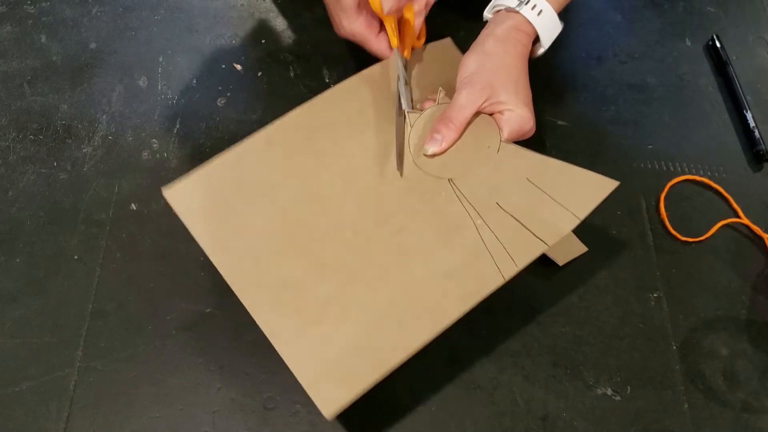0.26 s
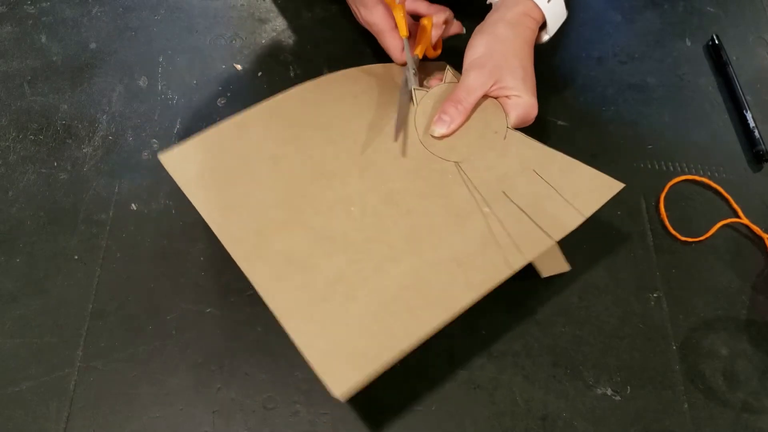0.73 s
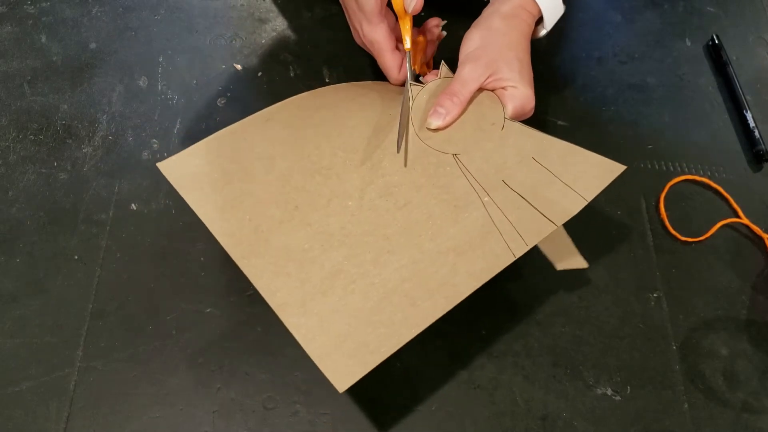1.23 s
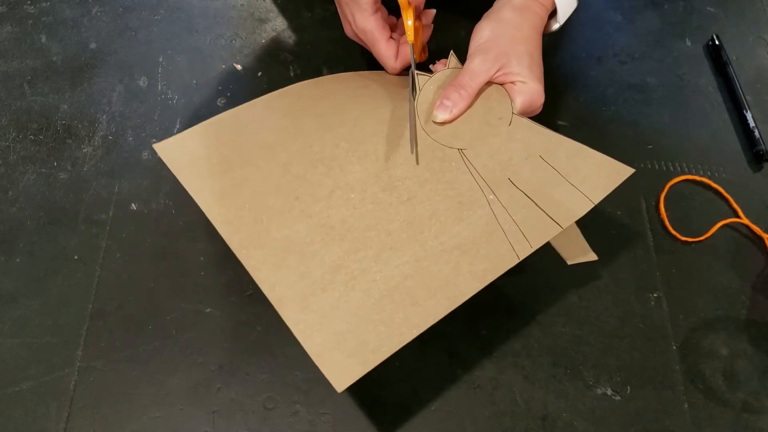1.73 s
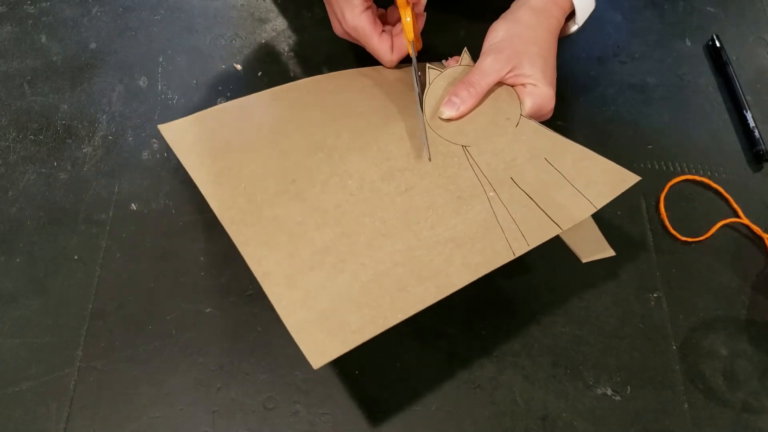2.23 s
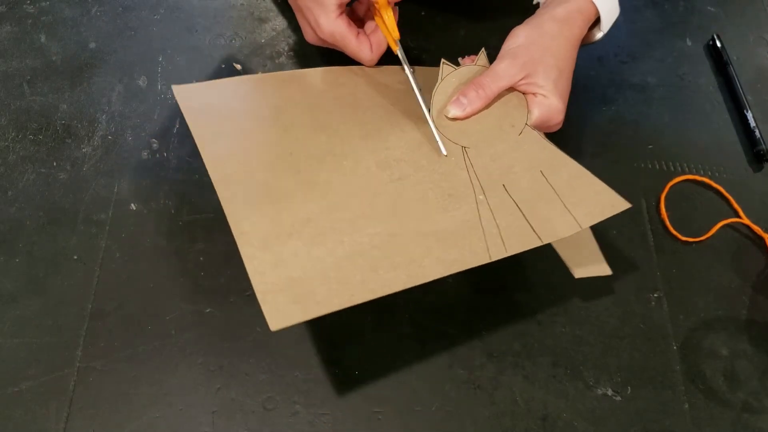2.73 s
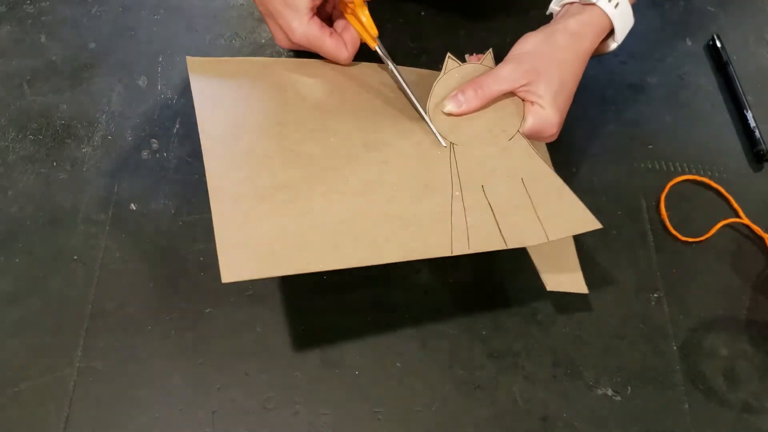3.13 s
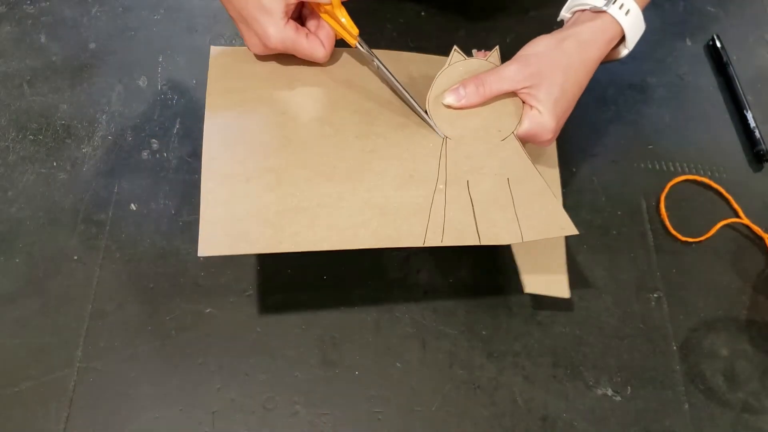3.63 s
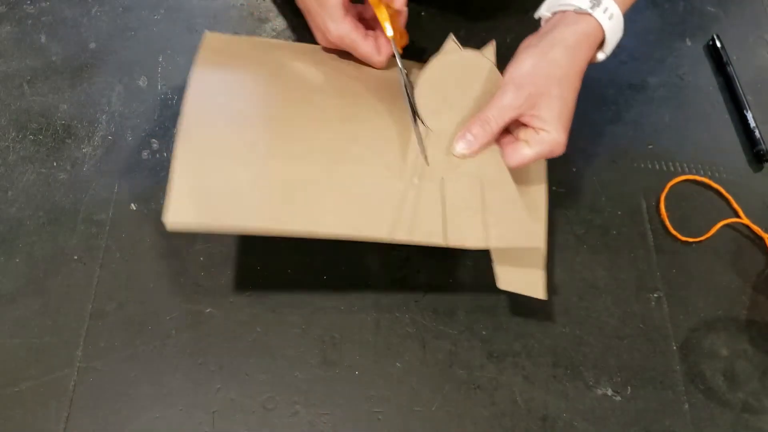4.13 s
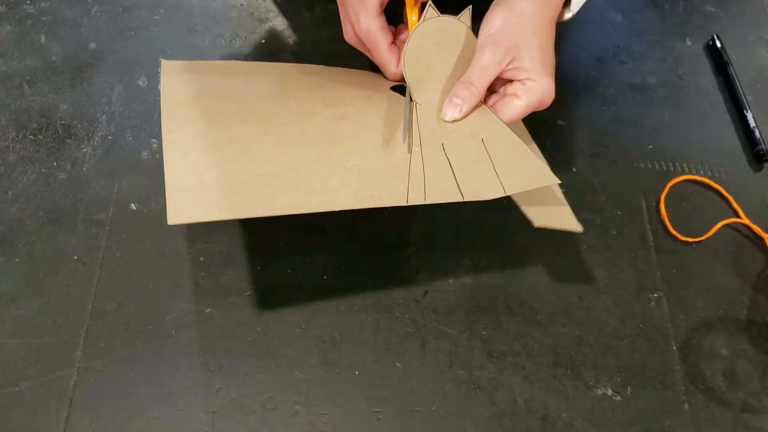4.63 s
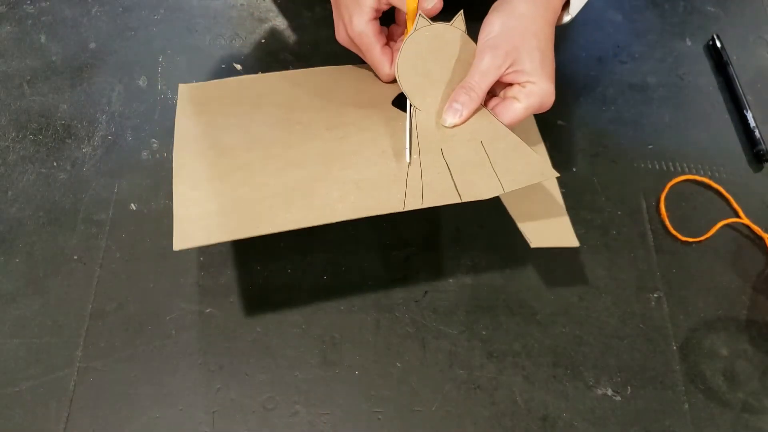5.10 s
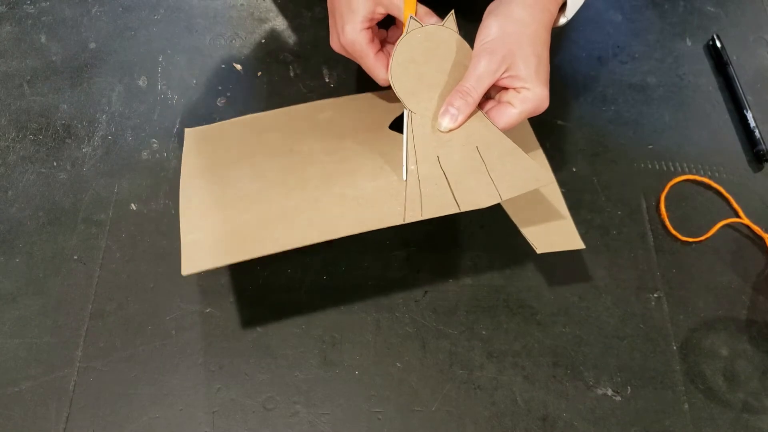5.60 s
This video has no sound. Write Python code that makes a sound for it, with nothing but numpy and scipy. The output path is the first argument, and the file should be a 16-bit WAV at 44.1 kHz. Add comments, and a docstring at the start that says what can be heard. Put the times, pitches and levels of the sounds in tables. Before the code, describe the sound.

Close stereo sound of scissors cutting thin cardboard, in about six seconds. From 0 to 0.9 s the card is handled: a dull bump near the start, short dry rasps around 0.3 to 0.7 with small creaks, and hollow, drumhead-like knocks at about 0.8. After a short pause, a slow cut from 1.25 crackles very faintly with tiny fibre snaps and slight blade grind. From 2.1 the snips grow stronger, becoming loud, crisp, irregular crunches with boxy thumps between 2.7 and 3.8, densest near 3.3 and 3.65. From 3.85 to 4.4 the sheet is turned with soft slides, light knocks and a small click. Near-quiet follows until 4.85, when another crackling stroke builds, with bright steel clacks at 5.23 to 5.4. Brief scrapes and a knock come at 5.65 to 5.8. A small hard room adds a short lively tail over faint steady air.

```python
"""First thin cardboard, bumped in the hand, knocks like a drumhead, then scissors work through it in uneven strokes.
Bursts of tiny snaps drive the modes of sheet and blades, and single fibres crackle in between. Streams of tiny
slips make the card's slide and the blades' grind, wavering resonances the creaks and strong single sheet modes,
and steel kicks the clacks, loudest near the end. A small, hard-walled room adds its tail, standing waves and
faint rush of air; a phone with two microphone ports hangs above the work."""
import sys
import numpy as np
from scipy import signal
from scipy.fft import rfft, irfft
from scipy.io import wavfile
from scipy.ndimage import uniform_filter1d

SR = 44100
rng = np.random.default_rng(int(sys.argv[2]) if len(sys.argv) > 2 else 0)


def generate_wav(sig):
    """Save sig (samples, or channels by samples) to the path in sys.argv[1] as 16-bit PCM at SR."""
    pcm = np.round(np.clip(np.atleast_2d(sig).T, -1, 1) * 32767).astype(np.int16)
    wavfile.write(sys.argv[1], SR, pcm)


N = 258426  # length of the scene in samples
TIME = np.arange(N) / SR
BURST_SIZE = 4096  # samples

# Levels in the tables are the balance within each layer; scene() trims whole layers.
# fibres giving way, and knocks of the card as it is handled and flexes:
# [t/s, time to peak/ms, sheet knock level/dB, crisp treble level/dB]
TEARS_AND_KNOCKS = [(0.079, 2.53, -43.5, -58), (0.3211, 0.96, -57.5, -62), (0.7975, 3.7, -42.5, -51),
                    (0.8622, 1.97, -43, -66), (1.3485, 1.8, -79, -69), (1.381, 5.5, -57.5, -61.5),
                    (1.4584, 1.08, -62, -63), (1.5225, 5.8, -55.5, -59.5), (1.5661, 4.8, -57.5, -63),
                    (1.596, 2.54, -65, -63.5), (1.704, 0.62, -87, -73), (1.759, 4.2, -60, -57),
                    (1.7697, 1.85, -64.5, -62.5), (1.8351, 0.85, -67, -60), (1.868, 0.77, -57, -57.5),
                    (1.8842, 0.81, -64, -59.5), (1.9214, 0.83, -59, -65.5), (1.977, 5.1, -54, -58),
                    (1.9869, 1.45, -52.5, -54), (2.0026, 4.6, -64, -60), (2.039, 7.9, -60.5, -58.5),
                    (2.1273, 2.3, -46, -45), (2.1575, 2.8, -49.5, -52), (2.1915, 2.5, -54.5, -62.5),
                    (2.229, 1.65, -55, -83), (2.2675, 3.15, -41, -51), (2.2921, 2.15, -45.5, -59),
                    (2.419, 2.52, -35.5, -50), (2.458, 2.7, -47, -53.5), (2.4908, 1.1, -41.5, -60.5),
                    (2.5675, 3.4, -44, -56), (2.621, 6.9, -42, -53.5), (2.6387, 1.52, -46, -63),
                    (2.7193, 2.27, -31, -41.5), (2.771, 2, -37, -46), (2.9382, 2.12, -29, -47),
                    (2.9906, 1.55, -30, -44.5), (3.0587, 0.4, -37, -50.5), (3.1436, 3.2, -30.5, -43),
                    (3.2992, 0.37, -46, -54.5), (3.309, 3.08, -28, -41), (3.3349, 0.74, -45, -52),
                    (3.3425, 1.34, -32, -44.5), (3.3708, 3.8, -37, -44), (3.4357, 1.9, -43.5, -51.5),
                    (3.634, 4.13, -30, -37), (3.6944, 0.53, -35, -42.5), (3.712, 4.9, -31.5, -37),
                    (3.8068, 2.15, -39.5, -43), (4.0027, .85, -57, -65), (4.058, 2.1, -48.5, -60.5),
                    (4.2394, 0.87, -38, -56.5), (4.2691, 2.3, -53, -71), (4.3812, 2, -50, -71),
                    (4.857, 6.5, -48, -58), (4.873, 2.9, -54, -51.5), (4.8921, 1.4, -53, -59),
                    (4.9556, 5.6, -63, -50), (4.9964, 2.1, -44.5, -46.5), (5.025, 1.6, -42, -52),
                    (5.1039, 3.2, -43, -48), (5.147, 2.73, -45, -51.5), (5.2335, 2.4, -42, -39),
                    (5.2513, 6, -37.5, -48), (5.3211, 1.36, -39, -50), (5.3535, 1.9, -39, -48),
                    (5.3935, 3.2, -36.5, -41), (5.4277, 3.23, -34, -39), (5.7352, 2.93, -41.5, -58),
                    (5.811, 0.59, -33, -55)]
# where the knock centres as the sheet is turned and gripped anew: [t/s, f/Hz]
SHEET_PITCH = [(0.1, 774), (1.87, 850), (1.98, 544), (2.45, 590), (3.65, 531), (3.82, 820), (4.1, 810),
               (4.24, 559), (5.2, 555), (5.8, 690)]
# bending modes of the held sheet: [f/Hz, width/Hz, level/dB]
SHEET_MODES = [(114, 110, -27.5), (314.6, 51, -5.5), (425.4, 39, 2), (507.7, 30, -1.5), (657.4, 11, 0.5),
               (776, 130, -8.5), (892.5, 97, -3), (1073, 98, -6)]
# mid-range spectrum of the snaps: [f/Hz, level/dB]
CRACK_SPECTRUM = [(700, -18.5), (1200, -11.5), (1450, -0.5), (1850, 0.5), (2400, -1.5), (3200, -1.5),
                  (4500, -3.5), (5500, -20.5), (8000, -41.5)]
# treble spectrum of the snaps: [f/Hz, level/dB]
CRISP_SPECTRUM = [(3000, -18), (5000, -5), (6300, -1), (7250, 3), (8100, -6.5), (9800, -3.5), (11000, -6.5),
                  (13000, -3), (15400, -7), (17000, -2)]
# the crack's level lies between treble and knock: share of the knock, and the crack's centre in Hz
CRACK_KNOCK_SHARE, CRACK_HZ = 0.19, 2040

# the hand squeezing the blades through the card: [start t/s, length/s, crackle level at the start/dB]
STROKES = [(1.252, 1, -72.5), (2.131, .56, -71.5), (3.291, 0.068, -64), (3.668, 0.2, -63),
           (4.852, 0.62, -57)]
SQUEEZE_DB_PER_S, STROKE_ATTACK_S, STROKE_RELEASE_S = 1.5, 0.047, 0.039

# card sliding on steel: [start t/s, length/s, level/dB, rumble relative level/dB, hiss relative level/dB]
SLIDES = [(0.0, 0.013, -67.5, 6, 5.5), (0.185, .08, -75, 6, 2.5), (0.276, .12, -57, -2.5, -2.5),
          (0.413, 0.08, -45, -8.5, -3.5), (0.556, 0.056, -47, -14, -8), (0.617, 0.092, -46, -1, -7),
          (0.748, 0.053, -43.5, -4, -15), (0.832, 0.02, -48.5, -1, 6), (3.848, 0.13, -66, -13, 5.5),
          (4.007, 0.1, -58, 4.5, -4), (4.104, 0.081, -55, 6, -6.5), (4.23, 0.055, -55.5, 8, 2.5),
          (4.327, 0.19, -70, -1.5, 1.5), (5.656, 0.063, -54.5, -2.5, -0.5), (5.745, 0.021, -41, -6, -2.5),
          (5.806, 0.067, -44.5, -3, -4.5)]
SLIDE_ATTACK_S, SLIDE_RELEASE_S = 0.033, 0.011
# low spectrum of the sheet: [f/Hz, level/dB]
RUMBLE_SPECTRUM = [(30, -64), (120, -25), (220, -17), (330, -14.5), (420, 0), (540, -2), (590, -2),
                   (645, 10.5), (710, -3.5), (830, 4.5), (1120, 1.5), (1400, -18.5), (2200, -24)]
# mid-range spectrum of the sliding card: [f/Hz, level/dB]
RASP_SPECTRUM = [(100, -50), (800, -2.5), (1300, -1), (1600, -4.5), (2200, -3), (3000, -5), (3700, -9.5),
                 (4400, -11.5), (7000, -19)]
# treble spectrum of the sliding card: [f/Hz, level/dB]
HISS_SPECTRUM = [(3000, -22.5), (5000, -6), (6200, -4), (7200, -2), (8300, -10.5), (11000, -6),
                 (13500, -4.5), (15500, -13), (17000, 0)]

# resonances of the grinding blades, before grinding() sharpens them: [f/Hz, width/Hz, level/dB]
GRIND_MODES = [(885, 130, 3.5), (1970, 120, -0.5), (2296, 260, -2), (7000, 220, 0), (7490, 630, -4)]
# in the first slow stroke the blades stand open and ring freely; otherwise the wedged card quiets the jolts
FREE_START_S, FREE_LENGTH_S, WEDGED_DB = 1.237, 0.742, -15.5
# the jolt of a light burst, its growth in dB per dB of crisp treble, and its time to peak
LIGHT_BURST_DB, JOLT_DB, JOLT_GROWTH, JOLT_MS = -60, -57, 1, 2.7

# blades knocking together: [t/s, level/dB, ring centre f/Hz, ring spread/octaves, contact time/ms]
CLACKS = [(0.862, -56, 2180, 0.75, 1.2), (3.2991, -42, 1810, 0.22, 0.76), (3.3425, -45.5, 2400, 0.38, 0.8),
          (4.2299, -47.5, 2200, 0.41, 0.62), (5.234, -28.5, 3440, 0.39, 0.47),
          (5.3194, -35.5, 2180, 0.23, 1.5), (5.3532, -43, 2060, 0.22, 2.97),
          (5.3934, -35.5, 1920, 0.36, 2.05)]
# ring of the blades: [f/Hz, width/Hz, level/dB]
BLADE_MODES = [(1966, 53, 0.5), (2080, 79, 7.5), (2610, 410, 5), (3140, 86, -5), (3510, 85, -2),
               (3840, 260, 2), (4300, 670, -5), (4700, 1400, -4.5), (7000, 400, -10.5)]

# creaks of card on steel, and single modes of the sheet ringing out strongly:
# [peak t/s, half length/s, f/Hz, level/dB]
CREAKS_AND_RINGS = [(0.432, 0.0037, 825, -41.5), (0.447, 0.013, 3720, -48), (0.454, 0.023, 1334, -48),
                    (0.679, 0.046, 2230, -51), (0.799, 0.006, 318, -56.5), (0.865, 0.0031, 275, -54),
                    (3.315, 0.0087, 872, -35.5), (3.356, 0.01, 289, -46.5), (4.865, 0.013, 792, -46.5),
                    (5.001, 0.007, 6030, -47.5), (5.165, 0.018, 284.6, -53.5), (5.346, 0.026, 378.5, -47.5)]
CREAK_Q = 12

# reverberation: [f/Hz, level against the direct sound/dB, t60/s]
ROOM_TAIL = [(150, 9.5, 0.3), (515, -6.5, 0.37), (1170, -4, 0.35), (3140, 0.5, 0.32), (7240, -6, 0.38),
             (15000, 0, 0.25)]
# standing waves of the room: [f/Hz, width/Hz, level/dB]
ROOM_MODES = [(301, 9.8, 3), (333, 7.3, -6.5), (407.6, 10.9, 1), (432, 6.3, -6), (504.3, 42, -1.5),
              (547, 5.2, 2.5), (647.2, 10, 3), (815, 7, -11), (805, 12, -15.5), (877, 6.3, -9),
              (1010, 2.3, -18.5), (1132, 6.2, 0.5), (1892, 9.1, 4.5), (1917, 24, -14)]
# spectrum of the empty room: [f/Hz, level/dB]
AIR_SPECTRUM = [(20, -20), (35, -5), (50, 3), (80, -2.5), (150, -10.5), (205, -2), (250, -17), (400, -13),
                (600, -19), (2400, -20.5), (8000, -30.5), (13000, -22.5), (16000, -24.5)]
AIR_DB = -76
# colour of the two ports: [f/Hz, left minus right level/dB]
PORT_BALANCE = [(100, 3.5), (250, 1), (500, 3), (1200, 3), (2200, 3), (4200, 3), (6000, 3), (7500, 10),
                (10000, -3.5), (15000, 3.5)]
TOP_HZ = 16100  # upper edge of the phone's range


def tears_and_knocks(knock_db, crack_db, crisp_db):
    """Each tear or bump of the card cracks, sprays treble and lets the bent sheet spring back."""
    out, f = np.zeros((2, N)), bins(BURST_SIZE)
    # the sheet radiates its middle range best
    radiation = 1 / np.sqrt((1 + (200 / f) ** 2) * (1 + (f / 1500) ** 4))
    crack = causal(colour(CRACK_SPECTRUM, BURST_SIZE) * bump(CRACK_HZ, octaves=0.48))
    crisp = colour(CRISP_SPECTRUM, BURST_SIZE)
    for s, ms, knock, treble in TEARS_AND_KNOCKS:
        crack_a, crack_b, crisp_a, crisp_b = (burst(ms, rate=9000, scatter_db=3.0) for _ in range(4))

        # the sheet is bent a little differently every time, which moves its modes
        bend = 1 + 0.039 * rng.standard_normal(len(SHEET_MODES))
        bent_modes = [(hz * k, width, db) for (hz, width, db), k in zip(SHEET_MODES, bend)]
        sheet = resonances(bent_modes, BURST_SIZE)
        knock_hz = np.interp(s, *np.transpose(SHEET_PITCH))
        # the sheet gets one clean kick besides the snaps; in a tear, the blade's load suddenly lets go
        kick = 1.2 * crack_a / np.sqrt(np.sum(crack_a ** 2) + 1e-18)
        kick[int(ms * .7 * SR / 1e3)] += 1
        drumhead = causal(sheet * radiation * bump(knock_hz, octaves=0.44))
        add(out, s, ring(kick, drumhead, knock + knock_db))

        sharp = treble + CRACK_KNOCK_SHARE * (knock - treble)
        add(out, s, ring(ports(crack_a, crack_b, likeness=0.42), crack, sharp + crack_db))

        # harder knocks reach higher: dB an octave above 7 kHz
        slope_db = 0.16 * (knock + 43)
        brightness = undb(slope_db * np.log2(np.maximum(f / 7000, 1)))
        spray = ports(crisp_a, crisp_b, likeness=0.057)
        add(out, s, ring(spray, causal(crisp * brightness), treble + crisp_db))
    return out


def creep(knock_db, crack_db, crisp_db):
    """Single fibres keep crackling between the larger tears, the louder the harder the squeeze."""
    sound = undb(knock_db) * rub(RUMBLE_SPECTRUM, rate=600, scatter_db=2, likeness=.9)
    sound += undb(crack_db) * rub(CRACK_SPECTRUM, rate=700, scatter_db=3.5, likeness=.55)
    sound += undb(crisp_db) * rub(CRISP_SPECTRUM, rate=1600, scatter_db=3.5, likeness=.15)
    return sound * squeeze() * undb(4.5 * walk(rate=90))


def sliding(rumble_db, rasp_db, hiss_db, catch_db):
    """The cut edge drags along the blade, catching unevenly, and the sheet radiates it."""
    rasp, rumble, hiss = np.zeros((3, N))
    for s, length, db, low_db, high_db in SLIDES:
        drag = gesture(s, length, SLIDE_ATTACK_S, SLIDE_RELEASE_S) * undb(db)
        rasp += drag
        rumble += drag * undb(low_db)
        hiss += drag * undb(high_db)
    sound = rumble * undb(rumble_db) * rub(RUMBLE_SPECTRUM, rate=2500, scatter_db=2.0, likeness=0.89)
    sound += rasp * undb(rasp_db) * rub(RASP_SPECTRUM, rate=2200, scatter_db=2.5, likeness=0.67)
    sound += hiss * undb(hiss_db) * rub(HISS_SPECTRUM, rate=10000, scatter_db=1.5, likeness=0.076)
    return sound * undb(catch_db * walk(rate=95))


def grinding(grind_db, catch_db):
    """Slips of edge on edge ring the blades, faintly in the first slow stroke, in a rush at each tear or knock."""
    slips = ports(fibres(N, rate=3500, scatter_db=3.0), fibres(N, rate=7500, scatter_db=2.0), likeness=0.44)
    # raising the gains to a power sharpens the resonances
    grind = irfft(rfft(slips) * causal(resonances(GRIND_MODES, N) ** 2.0), N)
    free = gesture(FREE_START_S, FREE_LENGTH_S, STROKE_ATTACK_S, STROKE_RELEASE_S)
    out = grind / np.std(grind) * free * undb(grind_db + catch_db * walk(rate=77))

    blades = causal(resonances(GRIND_MODES, BURST_SIZE) ** 1.46 * bump(hz=2180, octaves=0.85))
    for s, _, _, treble in TEARS_AND_KNOCKS:
        a, b = (burst(JOLT_MS, rate=15000, scatter_db=4.0) for _ in range(2))
        wedged = 1 - np.interp(s, TIME, free)
        db = JOLT_DB + JOLT_GROWTH * (treble - LIGHT_BURST_DB) + WEDGED_DB * wedged
        add(out, s, ring(ports(a, b, likeness=0.52), blades, db))
    return out


def clacks():
    """Steel meets steel: a rough contact and one clean kick ring the heavily damped blades."""
    out, blades = np.zeros((2, N)), resonances(BLADE_MODES, BURST_SIZE)
    for s, db, hz, octaves, ms in CLACKS:
        push = burst(ms, rate=34000, scatter_db=3.5)
        push = 2.1 * push / np.sqrt(np.sum(push ** 2) + 1e-18)
        push[int(ms * SR / 1e3)] += 1
        add(out, s, ring(push, causal(blades * bump(hz, octaves)), db))
    return out


def creaks_and_rings():
    """Creaks of card on steel and single sheet modes ringing out: each a wavering tone that swells and fades."""
    out, size = np.zeros((2, N)), 4 * BURST_SIZE
    t = (np.arange(size) - size / 2) / SR
    for s, half, hz, db in CREAKS_AND_RINGS:
        width = hz / CREAK_Q
        # the tone stays near its resonance while its phase strays
        stray = np.cumsum(rng.standard_normal(size)) * np.sqrt(np.pi * width / SR)
        stray = uniform_filter1d(stray, max(int(SR / width / 2), 1))
        flutter = undb(2.6 * walk(rate=max(width, 20), size=size))
        swell = np.exp(-.5 * (t / half) ** 2)
        tone = np.sin(2 * np.pi * hz * t + stray)
        add(out, s + t[0], tone * flutter * swell * undb(db))
    return out


def room(dry, modes_db, gap_s):
    """A diffuse tail, alike at both ports only in the bass, and the ring of standing waves."""
    size = 32768
    t, f = np.arange(size) / SR, bins(size)
    points, wet_db, t60 = np.transpose(ROOM_TAIL)
    noise = rfft(rng.standard_normal((2, size)))
    noise = ports(noise[0], noise[1], np.sinc(np.minimum(f / 1500, 1)))
    centres = 125 * 2. ** np.arange(8)  # octave bands
    tail = 0
    for hz, share in zip(centres, np.eye(len(centres))):
        decay = np.exp(-np.log(1000) * t / along(hz, points, t60))
        fade = decay * np.clip(t / gap_s - 1, 0, 1)  # silent for the gap, then fades in over another
        band = irfft(noise * along(f, centres, share))
        tail = tail + band * fade / np.sqrt(np.sum(fade ** 2)) * undb(along(hz, points, wet_db))
    waves = np.zeros(size)
    for hz, width, db in ROOM_MODES:
        decay = np.exp(-np.pi * width * t)
        waves += undb(db) * 2 * np.pi * width / SR * decay * np.sin(2 * np.pi * hz * t)
    return signal.fftconvolve(dry, tail + undb(modes_db) * waves, axes=1)[:, :N]


def air(db):
    """The faint steady rush of the empty room: coloured noise, most alike at both ports in the bass."""
    noise = rfft(rng.standard_normal((2, N)))
    likeness = 0.53 / (1 + (bins(N) / 900) ** 2)
    rush = irfft(ports(noise[0], noise[1], likeness) * colour(AIR_SPECTRUM, N), N)
    return rush / np.std(rush) * undb(db)


def fibres(size, rate, scatter_db):
    """Tiny snaps or slips, rate a second, of uneven size and either sign."""
    snaps = rng.random(size) < rate / SR
    signs = np.sign(rng.standard_normal(size))
    return snaps * signs * undb(scatter_db * np.minimum(rng.exponential(size=size), 3.5))


def burst(ms, rate, scatter_db):
    """An avalanche of snaps that peaks after ms and dies away."""
    u = np.arange(BURST_SIZE) / SR * 1000 / ms
    return fibres(BURST_SIZE, rate, scatter_db) * u * np.exp(-u)


def rub(points, rate, scatter_db, likeness):
    """A steady stream of tiny slips with a given spectrum, rms 1."""
    slips = ports(fibres(N, rate, scatter_db), fibres(N, rate, scatter_db), likeness)
    y = irfft(rfft(slips) * causal(colour(points, N)), N)
    return y / np.std(y)


def gesture(start, length, attack_s, release_s):
    """A movement of the hand: it swells around its start, holds and dies away."""
    rise = np.clip((TIME - start) / attack_s + .5, 0, 1)
    return rise * np.exp(-np.maximum(TIME - start - length, 0) / release_s)


def squeeze():
    """Force on the blades as a gain; it builds through every stroke."""
    force = np.zeros(N)
    for s, length, db in STROKES:
        build_db = SQUEEZE_DB_PER_S * np.clip(TIME - s, 0, length)
        force += gesture(s, length, STROKE_ATTACK_S, STROKE_RELEASE_S) * undb(db + build_db)
    return force


def walk(rate, size=N):
    """Random levels held 1 / rate s and slewed; spread near 1."""
    hold = int(SR / rate)
    steps = rng.standard_normal(size)[np.arange(size) // hold]
    return 1.2 * uniform_filter1d(steps, hold)


def ports(common, apart, likeness):
    """Two ports hear one part alike and one part with opposite signs."""
    likeness = np.clip(likeness, 0, 1)
    return np.sqrt((1 + likeness) / 2) * common + np.sqrt((1 - likeness) / 2) * np.array([apart, -apart])


def ring(push, response, db):
    """A push sent through a response; db is its energy spread over a hundredth of a second."""
    y = irfft(rfft(push) * response)
    energy = np.mean(np.sum(y ** 2, axis=-1))
    return y * undb(db) / np.sqrt(energy / (SR / 100))


def resonances(modes, size):
    """Gains of a set of damped modes; between two neighbours they cancel."""
    f = bins(size)
    return np.abs(sum(undb(db) / (1 + 1j * (f * f - hz * hz) / (f * width)) for hz, width, db in modes))


def bump(hz, octaves):
    """Gains that favour the modes near one frequency."""
    return 1 / (1 + .5 * (np.log2(bins(BURST_SIZE) / hz) / octaves) ** 2)


def colour(points, size):
    """Gains of a (Hz, dB) spectrum."""
    return undb(along(bins(size), *np.transpose(points)))


def causal(gain):
    """The response with these gains that starts at once and then rings out (minimum phase)."""
    cepstrum = irfft(np.log(np.maximum(gain, 1e-5)))
    half = len(cepstrum) // 2
    cepstrum[1:half] *= 2
    cepstrum[half + 1:] = 0
    return np.exp(rfft(cepstrum))


def along(hz, points, values):
    """Straight lines between points on a log-frequency axis."""
    return np.interp(np.log(hz), np.log(points), values)


def bins(size):
    """Frequencies of a spectrum, kept above zero."""
    return np.maximum(np.fft.rfftfreq(size, 1 / SR), 1)


def undb(db):
    """Decibels to gain."""
    return 10 ** (np.asarray(db) / 20)


def add(out, s, sound):
    """Mix a sound in at a time."""
    start = max(int(s * SR), 0)
    part = sound[..., :max(N - start, 0)]
    out[:, start:start + part.shape[-1]] += part


def scene():
    """The work sits a little left of the phone, and each port colours it in its own way."""
    dry = tears_and_knocks(knock_db=-2.0, crack_db=-5.0, crisp_db=0.5)
    dry += creep(knock_db=-7.0, crack_db=-8, crisp_db=-4)
    dry += sliding(rumble_db=-5.5, rasp_db=-4.5, hiss_db=-3.0, catch_db=2.0)
    dry += grinding(grind_db=-78.5, catch_db=6.0)
    dry += clacks() + creaks_and_rings()
    heard = dry + room(dry, modes_db=0.5, gap_s=0.0012)
    balance = np.sqrt(colour(PORT_BALANCE, N))  # half the difference goes to each port
    return irfft(rfft(heard) * np.array([balance, 1 / balance]), N) + air(AIR_DB)


def record(dry):
    """The phone cuts the very top with a steep low-pass."""
    low_pass = signal.ellip(10, .2, 70, TOP_HZ, fs=SR, output="sos")
    return signal.sosfilt(low_pass, dry)


dry = scene()
out = record(dry)
generate_wav(out)
```